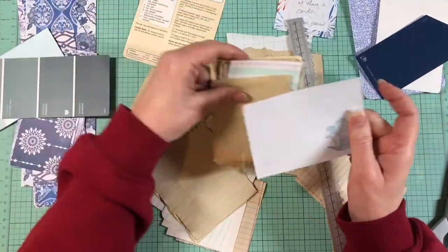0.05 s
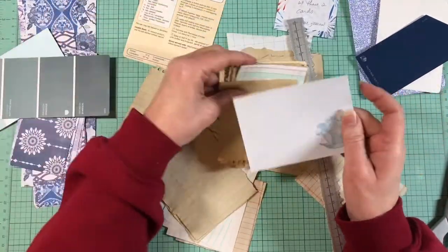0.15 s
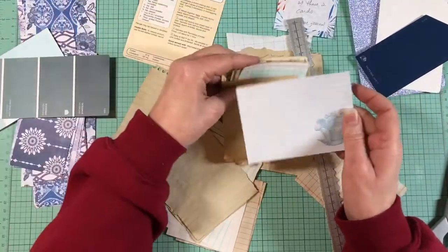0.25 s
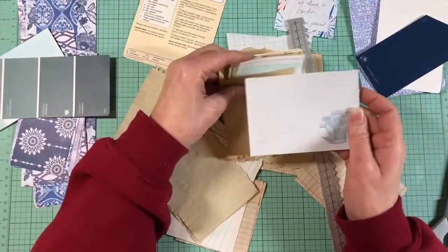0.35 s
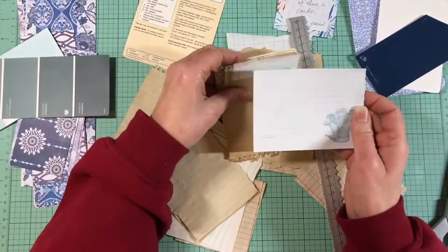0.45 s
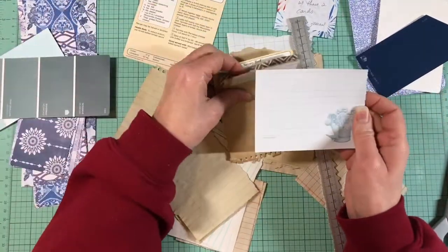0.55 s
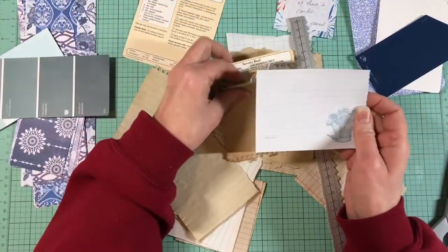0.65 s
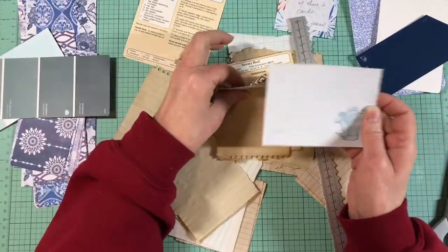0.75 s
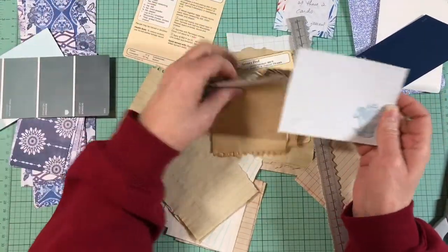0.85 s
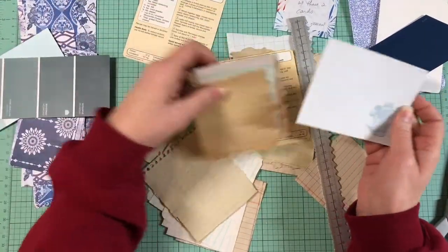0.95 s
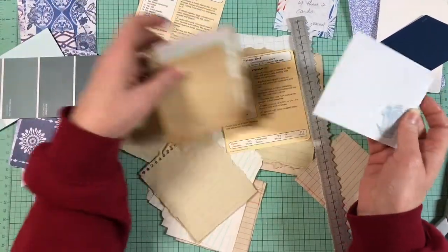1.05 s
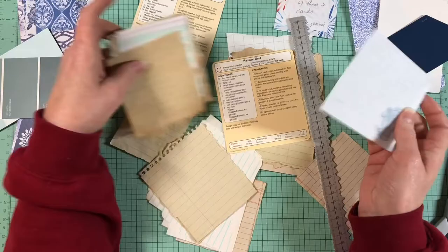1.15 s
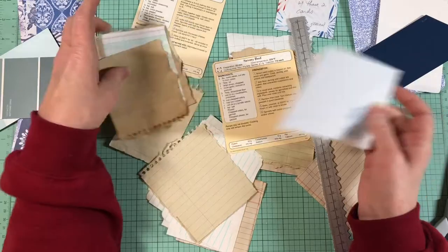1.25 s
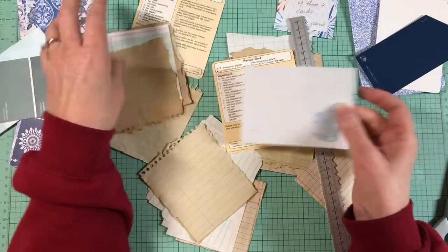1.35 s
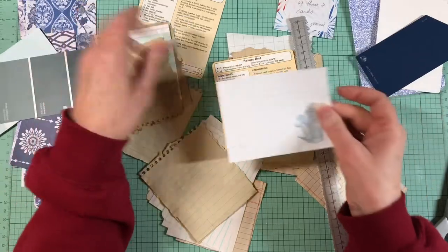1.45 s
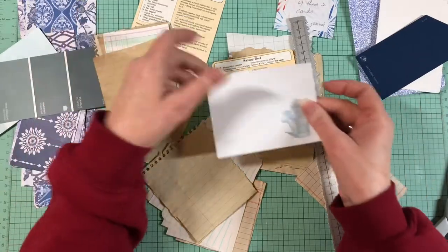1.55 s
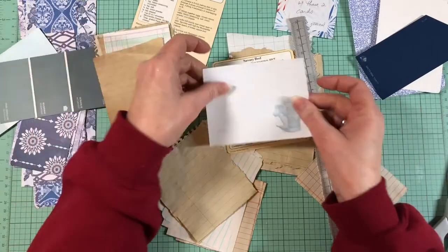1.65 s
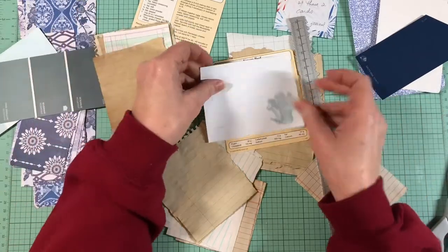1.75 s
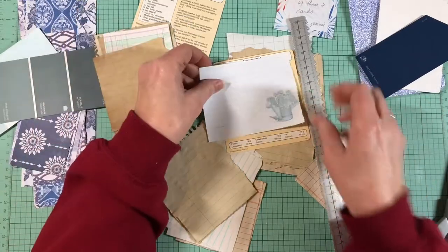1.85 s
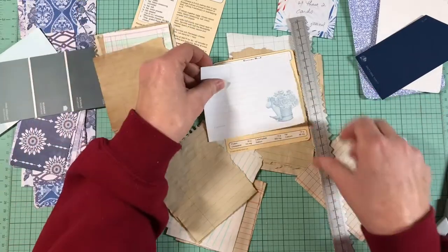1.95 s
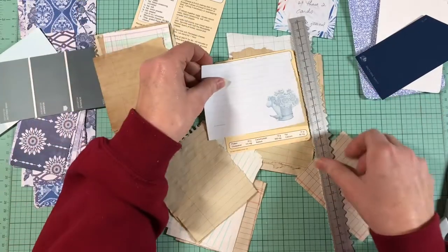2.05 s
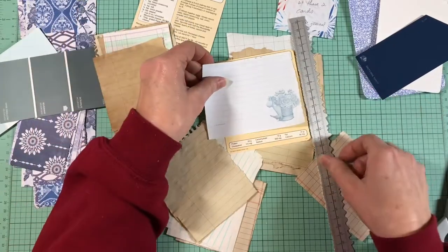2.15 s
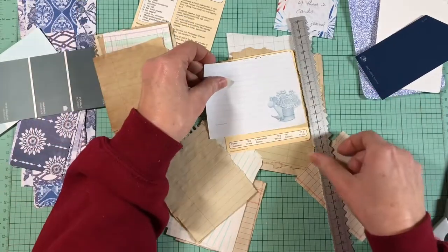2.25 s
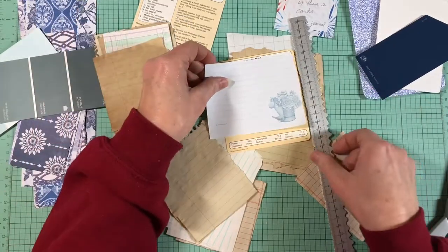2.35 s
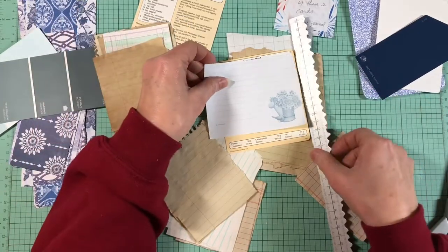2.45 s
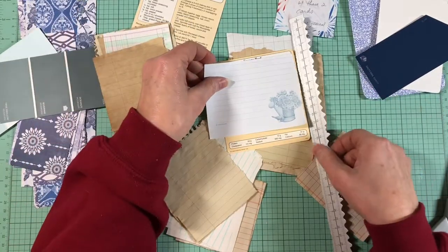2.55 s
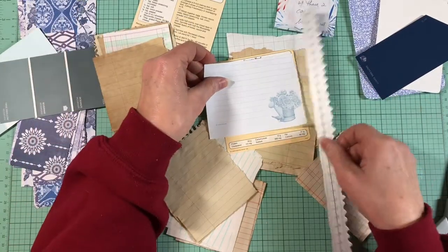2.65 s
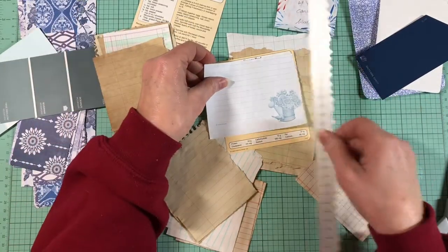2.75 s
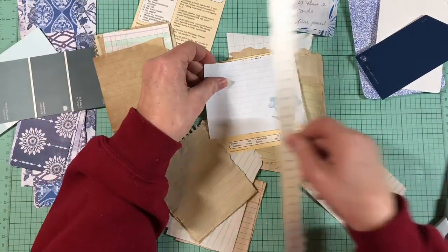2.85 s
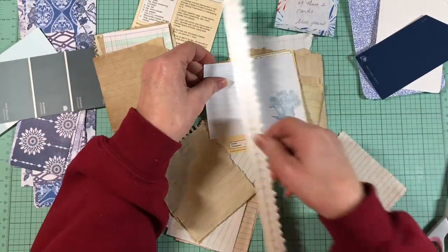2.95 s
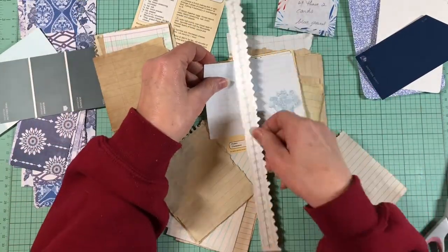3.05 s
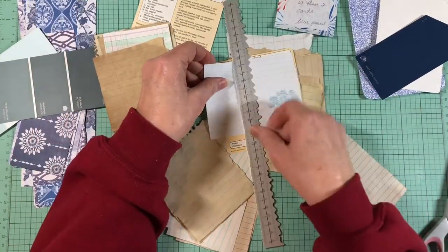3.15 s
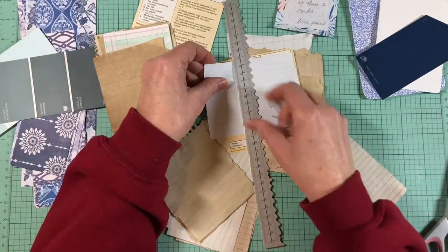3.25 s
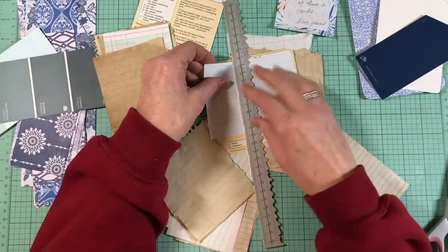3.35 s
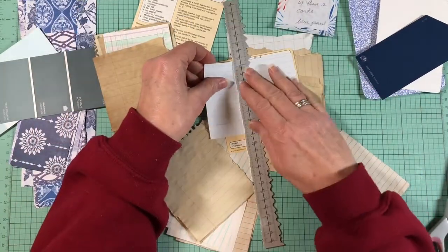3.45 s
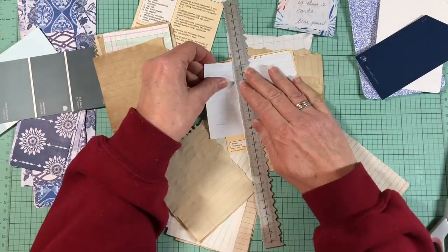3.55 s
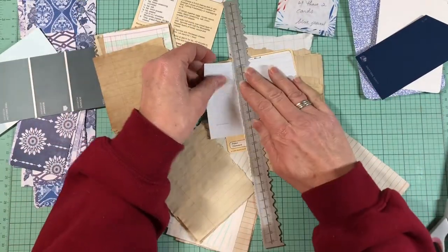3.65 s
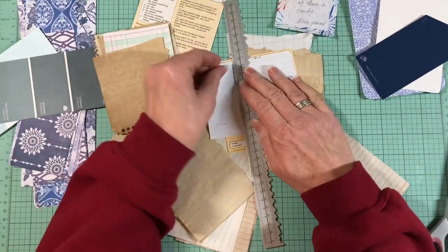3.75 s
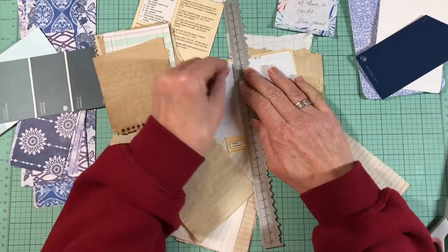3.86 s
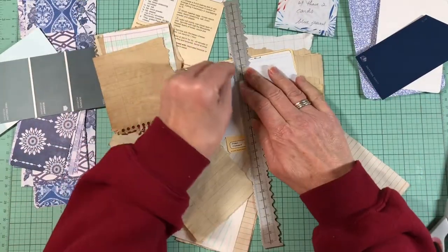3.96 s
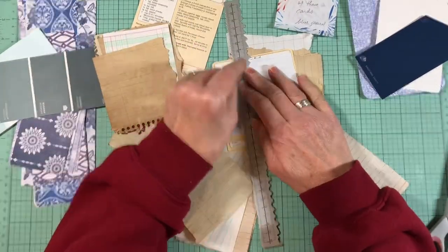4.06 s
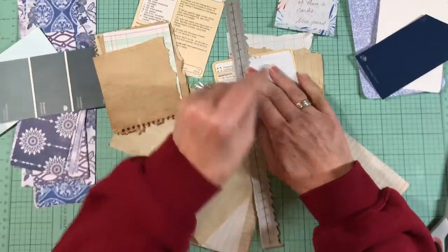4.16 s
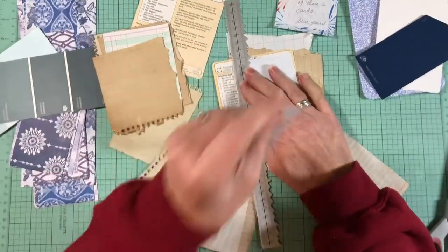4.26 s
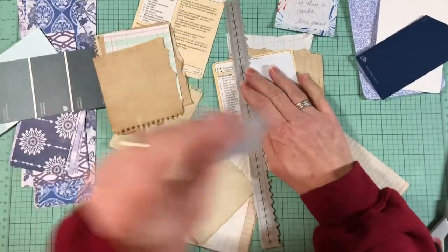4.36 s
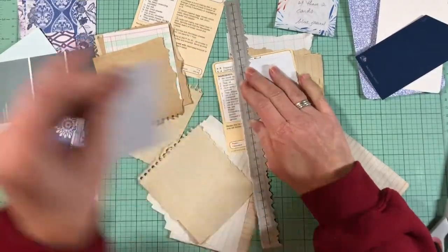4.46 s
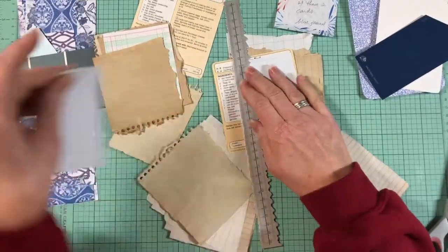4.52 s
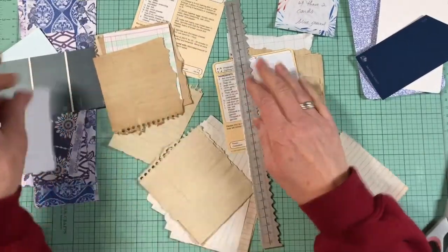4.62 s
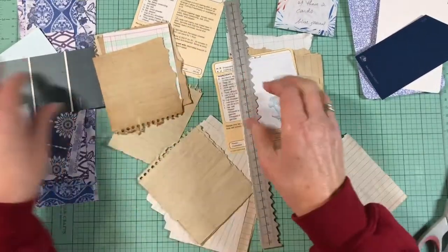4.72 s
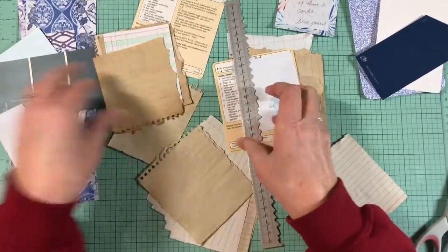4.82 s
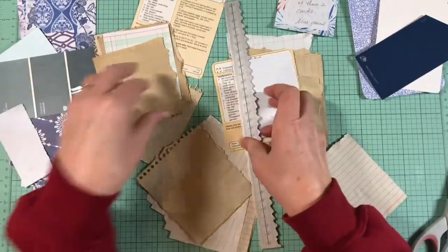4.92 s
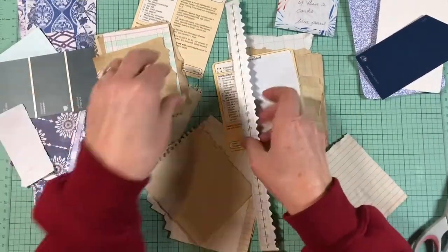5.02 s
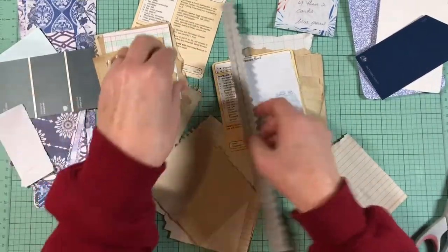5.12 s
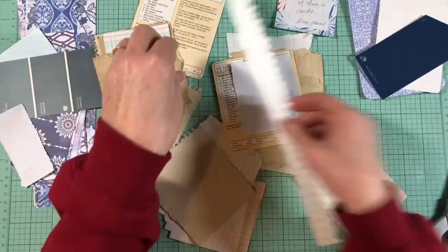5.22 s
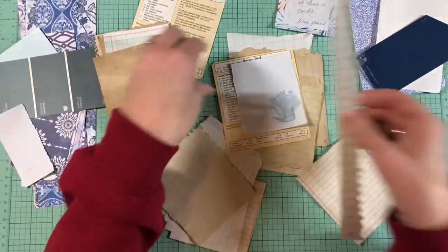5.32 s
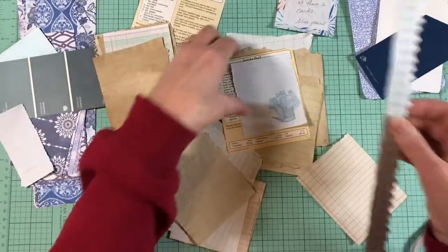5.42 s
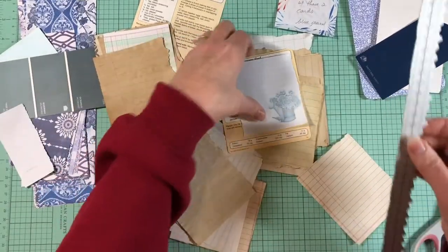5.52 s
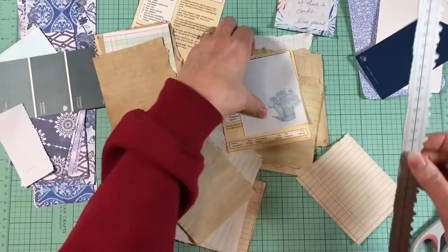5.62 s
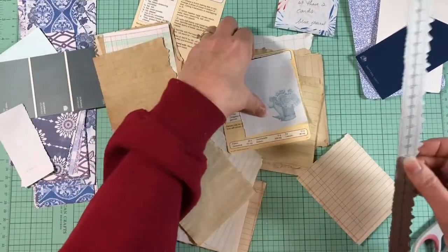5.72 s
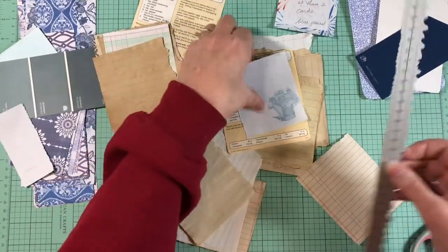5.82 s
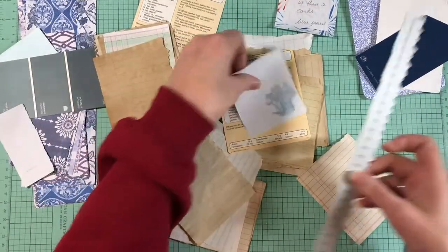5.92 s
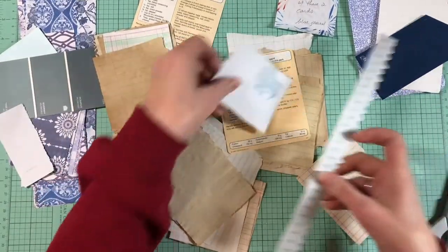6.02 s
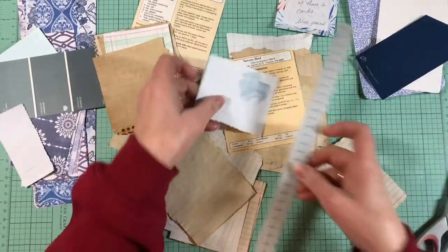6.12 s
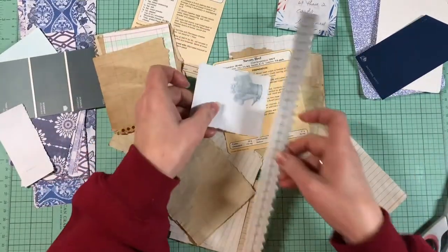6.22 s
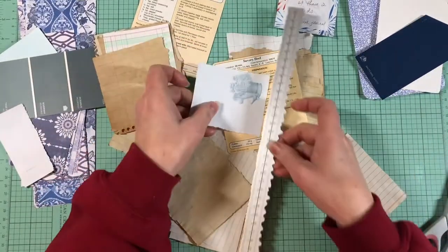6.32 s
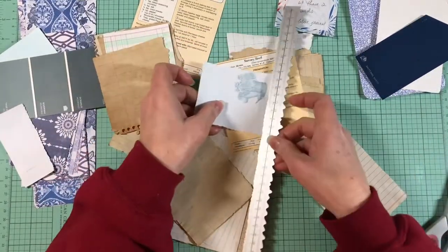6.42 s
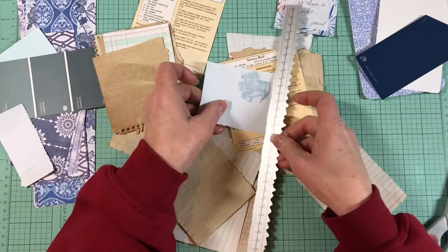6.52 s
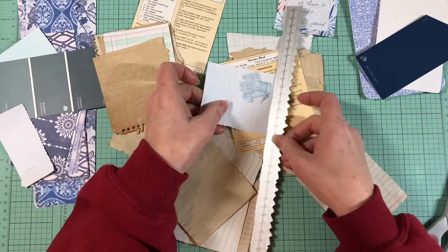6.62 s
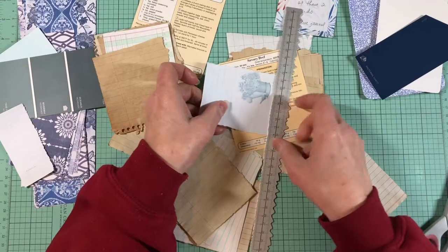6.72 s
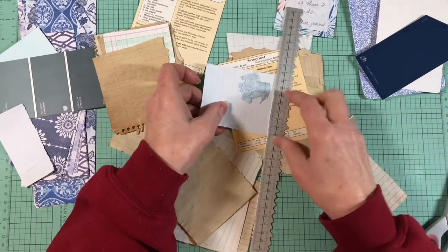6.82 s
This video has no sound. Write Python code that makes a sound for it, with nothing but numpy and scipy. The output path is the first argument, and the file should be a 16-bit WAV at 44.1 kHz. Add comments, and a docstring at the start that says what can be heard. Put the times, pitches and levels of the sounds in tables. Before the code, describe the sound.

Paper sheets slide and flick in a quiet room, a steel ruler clatters, then one quick, crisp rip along its edge and more soft paper handling.

```python
"""Sheets of paper slide and flick about on a craft table, close by in a small quiet room with a low rumble.
Strokes are filtered fibre clicks; hands bump the mat, and a steel ruler taps and clatters as it is handled.
A strip is ripped off along the ruler's edge: dense clicks of snapping fibres drive the sheet's resonances,
strong bunches snap in noise bursts, and a few decaying sines leave a faint ring.
Paper handling goes on afterwards, with a short falling chirp as a card's edge drags off the pile."""
import sys
import numpy as np
from scipy import signal
from scipy.fft import rfft, irfft, next_fast_len
from scipy.io import wavfile
from scipy.ndimage import uniform_filter1d

SR = 44100
rng = np.random.default_rng(int(sys.argv[2]) if len(sys.argv) > 2 else 0)


def file_out(sig):
    """Save sig as 16-bit WAV at sys.argv[1]."""
    # one column per channel
    cols = np.atleast_2d(sig).T
    # limit, then scale
    lim = np.clip(cols, -1, 1)
    pcm = np.round(lim * 32767).astype(np.int16)
    wavfile.write(sys.argv[1], SR, pcm)


N = 303532
TIME = np.arange(N) / SR


def amp(db):
    """Turn decibels into a linear gain."""
    return 10 ** (np.asarray(db) / 20)


def unit(x):
    """Scale to rms 1."""
    return x / np.sqrt(np.mean(x ** 2))


def lookup(points, hz):
    """Read (Hz, value) points on a log-frequency axis."""
    f, value = np.transpose(points)
    return np.interp(np.log(np.maximum(hz, 1)), np.log(f), value)


def colour(x, points, size=4096):
    """Causal minimum-phase filter with the given (Hz, dB) shape; white noise keeps its power."""
    cepstrum = irfft(np.log(amp(lookup(points, np.fft.rfftfreq(size, 1 / SR)))))
    # folding the cepstrum onto positive time makes the filter causal
    cepstrum[1:size // 2] *= 2
    cepstrum[size // 2 + 1:] = 0
    response = irfft(np.exp(rfft(cepstrum)))
    response = response / np.linalg.norm(response)
    return signal.fftconvolve(x, response)[:len(x)]


def resonate(x, hz, width):
    """One resonance, gain 1 at its centre."""
    centre = min(hz, SR / 2 - 1)
    sharpness = hz / min(width, SR / 4)
    b, a = signal.iirpeak(centre, sharpness, SR)
    return signal.lfilter(b, a, x)


def walk(rate):
    """Smooth random drift, rms 1, that takes a new direction about `rate` times a second."""
    hold = max(int(SR / rate), 1)
    steps = np.repeat(rng.standard_normal(N // hold + 1), hold)
    return unit(uniform_filter1d(steps, hold)[:N])


def grains(rate, spread_db):
    """Random clicks of either sign, a few much larger than the rest; rms 1."""
    size = amp(spread_db * np.minimum(rng.exponential(size=N), 4))
    struck = rng.random(N) < rate / SR
    return unit(struck * size * rng.choice([-1, 1], N))


def add(track, s, sound):
    """Mix a sound into a track at time s."""
    i = max(int(s * SR), 0)
    track[i:i + len(sound)] += sound[:N - i]


# broad resonance of a loose sheet: frequency_ratio (multiple of its resonance), level_db
SHEET_BODY_COLOUR = [(.1, -24), (.35, -13), (.6, -9), (.83, -5), (1.1, -5.5), (1.6, -9.5), (2.6, -19),
                     (5, -26), (12, -44.5)]


def sheet_body(x, hz):
    """A broad resonance of a loose sheet, rms 1; the stiffer it is held, the higher it lies."""
    return unit(colour(x, [(ratio * hz, db) for ratio, db in SHEET_BODY_COLOUR]))


def flex(x, rate, depth_db):
    """A bending sheet radiates unevenly: every half octave swells and fades on its own; rms 1."""
    size = next_fast_len(N)
    spectrum, out = rfft(x, size), 0
    octave = np.log2(np.clip(np.fft.rfftfreq(size, 1 / SR), 500, 16000) / 500)
    for band in range(11):
        # neighbouring bands crossfade
        share = np.maximum(1 - np.abs(2 * octave - band), 0)
        out = out + irfft(spectrum * share, size)[:N] * amp(depth_db * walk(rate))
    return unit(out)


# tone balance of the quiet room: frequency_hz, level_db (per Hz)
ROOM_TONE_COLOUR = [(18, -34.5), (30, -23.5), (50, -1), (90, -8), (150, -1), (215, -6), (270, -11),
                    (380, -15.5), (800, -22.5), (1500, -30), (4000, -32.5), (8800, -38.5), (12500, -36.5),
                    (16000, -39)]
ROOM_TONE_DB = -61


def room_tone():
    """Steady low rumble with a faint hiss, from coloured noise."""
    return amp(ROOM_TONE_DB) * unit(colour(rng.standard_normal(N), ROOM_TONE_COLOUR))


# strokes of paper or ruler over paper: peak_s, length_s, friction_db,
# hiss_db (fine hiss against friction), sheet_hz (sheet resonance)
SLIDE_STROKES = [ (.004, .14, -57, -10, 940), (0.118, 0.28, -64.5, -2.5, 1350),
                 (0.211, 0.14, -54, -2, 1360), (0.274, 0.036, -56, -2, 1500),
                 (0.348, 0.17, -56, -0.5, 1450), (0.484, .13, -46.5, -7, 1850),
                 (.645, .21, -47.5, -3, 1950), (0.837, 0.13, -61, 1.5, 1600), (0.928, 0.17, -53.5, 2, 1450),
                 (1.095, 0.54, -66, 2.5, 1600), (1.282, 0.24, -58.5, 0, 1560), (1.453, 0.12, -65, -7, 1350),
                 (1.696, 0.21, -58, -4, 1900), (1.83, 0.084, -60, -6, 1770), (2, 0.95, -67.5, -1.5, 1650),
                 (2.148, .1, -83, 22, 1500), (2.329, 0.078, -61, -1, 1800), (2.507, 0.3, -71, 4.5, 1170),
                 (2.611, 0.062, -62, 9, 1760), (3.129, 0.093, -55, 3, 1900), (3.437, 0.26, -73, 3, 2200),
                 (3.682, 0.28, -54.5, -5, 2400), (3.887, .1, -65.5, 0.5, 1700),
                 (3.987, 0.077, -55, 0, 1800), (4.509, 0.31, -61.5, -2.5, 1830),
                 (5.018, 0.47, -61, 1.5, 1850), (5.641, .06, -65, 0, 2140), (5.846, 0.14, -60.5, 3.5, 1900),
                 (5.949, 0.31, -51, -2, 1950), (6.18, 0.18, -70, -4, 1400), (6.487, 0.42, -60, -3.5, 1650),
                 (6.632, 0.056, -53, -2, 1810), (6.855, 0.17, -66, -1, 1900)]
# tone balance of rubbing friction: frequency_hz, level_db
FRICTION_COLOUR = [(300, -32.5), (900, -20.5), (1900, -5), (3600, 3), (5200, 0.5), (7500, -9),
                   (16000, -18.5)]
# bright fibre noise, also used for crackle and cracks: frequency_hz, level_db
FIBRE_HISS_COLOUR = [(3000, -21.5), (7500, -8.5), (10000, -2), (12500, 2.5), (16000, 0.5)]
RISE_SHARE = 0.51  # part of a stroke spent speeding up
# body against friction: slacker sheets lie lower and sound fuller
SHEET_HZ, SHEET_DB, SHEET_DB_PER_OCTAVE = 1710, -6.5, -10.5
# stray creases that click while a sheet moves
CREASES_PER_S, CREASE_DB, CREASE_HZ = 94, -12, 2500


def sliding():
    """Fibres catch and slip as sheets rub; each stroke swells and fades while the contact comes and goes."""
    out = np.zeros(N)
    contact = amp(1.6 * walk(130))
    slips = grains(2600, 3.2) * contact
    friction = flex(colour(slips, FRICTION_COLOUR), 36, depth_db=4.5)
    hiss = unit(colour(grains(9000, 2.2) * contact, FIBRE_HISS_COLOUR))
    catches = grains(1500, 2.4) * contact
    creases = amp(CREASE_DB) * sheet_body(grains(CREASES_PER_S, 2.2), CREASE_HZ)
    for peak, length, db, hiss_db, hz in SLIDE_STROKES:
        rise = length * RISE_SHARE
        fall = length - rise
        span = slice(max(int((peak - 2 * rise) * SR), 0), int((peak + 2 * fall) * SR))
        away = np.interp(TIME[span] - peak, [-2 * rise, 0, 2 * fall], [2, 0, 2])
        speed = np.exp(-2.3 * away ** 1.36)  # about 20 dB down at each end of the stroke's length
        body_db = SHEET_DB + SHEET_DB_PER_OCTAVE * np.log2(hz / SHEET_HZ)
        body = amp(body_db) * sheet_body(catches[span], hz)
        stroke = friction[span] + creases[span] + amp(hiss_db) * hiss[span] + body
        out[span] += amp(db) * speed * stroke
    return out


# echo decay time: frequency_hz, t60_s
ECHO_T60 = [(150, 0.12), (1000, 0.33), (4000, 0.24), (15000, 0.076)]
# echo against direct sound: frequency_hz, level_db
ECHO_COLOUR = [(100, -2), (1000, -8), (4000, -12), (8000, -6.5), (15000, -13)]


def room(x, size=22050):
    """Diffuse echo of a small room, building over a few ms; the middle outlasts the bass and treble."""
    age, hz = np.arange(size) / SR, np.fft.rfftfreq(size, 1 / SR)
    noise, response = rfft(rng.standard_normal(size)), 0
    for low in 70 * 2 ** np.arange(8):  # octave bands
        centre = low * np.sqrt(2)
        fade = amp(-60 * age / lookup(ECHO_T60, centre)) * (1 - np.exp(-age / 0.002))
        band = irfft(noise * (hz >= low) * (hz < 2 * low), size)
        level = amp(lookup(ECHO_COLOUR, centre))
        response = response + band * fade / np.linalg.norm(fade) * level
    return signal.fftconvolve(x, response)[:N]


def ticks(rows, body_t60_s, crack_t60_s, size=8192):
    """Each snap, flick or tap is a bright crack and a broad sheet resonance that crinkles on briefly."""
    out, age = np.zeros(N), np.arange(size) / SR
    for s, body_db, hz, crack_db in rows:
        body_noise, crack_noise, crease_noise = rng.standard_normal((3, size))
        # the blow is dense; the creases that settle after it are sparse, uneven clicks
        body_blow = body_noise * amp(-60 * age / body_t60_s)
        crack_blow = crack_noise * amp(-60 * age / crack_t60_s)
        crinkle = unit(crease_noise ** 5) * amp(-60 * age / .11)
        body = sheet_body(body_blow + amp(-15) * crinkle, hz)
        crack = colour(crack_blow + amp(-30.5) * crinkle, FIBRE_HISS_COLOUR)
        add(out, s, amp(body_db) * body / np.linalg.norm(body) + amp(crack_db) * crack / np.linalg.norm(crack))
    return out


# sheets buckle or flick: start_s, body_db (energy), body_hz, crack_db (energy)
PAPER_FLICKS = [(.444, -21.5, 2090, -24), (.463, -16.5, 3540, -27), (.4761, -15.5, 3800, -15.5),
                (.604, -16, 2920, -25), (.641, -25, 2880, -36), (.993, -28.5, 1010, -23),
                (1.1177, -32, 3200, -50), (1.183, -33, 1560, -28), (1.349, -25.5, 2400, -38),
                (1.593, -28.5, 1340, -40), (1.6316, -8.5, 1370, -24), (1.647, -16.5, 1314, -28),
                (1.725, -27.5, 1690, -42), (3.966, -16.5, 3330, -18), (4.664, -25.5, 1665, -41),
                (4.6902, -29.5, 1930, -42.5), (4.707, -32.5, 1680, -45), (5.8523, -29, 4500, -14.5)]


def flicks():
    """Sheets buckle or flick against the pile, with a short body and a shorter crack."""
    return ticks(PAPER_FLICKS, body_t60_s=0.04, crack_t60_s=.018)


# hands and ruler bump the table: start_s, peak_db (of the table's tone), rumble_db (against that tone)
TABLE_BUMPS = [(1.635, -59.5, 6.5), (2.015, -49, -7), (3.07, -58.5, 4), (3.143, -51.5, -7), (3.569, -61, 3),
               (3.97, -49, -10), (4.038, -31, -5), (4.068, -25.5, -21), (4.182, -40, -14),
               (4.912, -51, -13.5), (6.678, -58.5, 1.5)]
TABLE_HZ, BUMP_SWELL_S = 136.6, .018


def bumps(size=12000):
    """A soft push swells and dies in the table's lowest mode, with a dull rumble above it."""
    out, age = np.zeros(N), np.arange(size) / SR
    push = (age / BUMP_SWELL_S * np.exp(1 - age / BUMP_SWELL_S)) ** 2
    tone = np.sin(2 * np.pi * TABLE_HZ * age)
    for s, db, rumble_db in TABLE_BUMPS:
        rumble = unit(resonate(resonate(rng.standard_normal(size), 286.3, 260), 290, 350))
        add(out, s, amp(db) * push * (tone + amp(rumble_db) * rumble))
    return out


# the ruler taps and clatters: start_s, body_db (energy), body_hz, crack_db (energy)
RULER_TAPS = [(1.999, -30.5, 4000, -33), (2.012, -32, 2720, -20.5), (3.0544, -24.5, 3400, -27),
              (3.0661, -13.5, 2720, -33), (3.09, -15.5, 2200, -31), (3.1422, -11, 2330, -19),
              (3.283, -37, 3300, -28), (3.305, -34, 3500, -20.5), (3.407, -34, 2900, -33.5),
              (4.8355, -29, 2600, -30), (4.8536, -26.5, 1980, -29), (4.903, -20.5, 2850, -26),
              (4.996, -29, 3810, -24), (5.5066, -27, 2900, -42), (5.5364, -30.5, 2860, -38.5),
              (6.6552, -16.5, 3520, -10.5), (6.6705, -12.5, 4210, -17.5), (6.684, -7, 3040, -8)]


def taps():
    """The ruler taps and clatters as it is gripped, lifted and laid down."""
    return ticks(RULER_TAPS, body_t60_s=0.028, crack_t60_s=.02)


# tone balance of the tearing rasp: frequency_hz, level_db
RASP_COLOUR = [(60, -22), (110, 5), (200, 3), (380, -2.5), (520, 2.5), (680, -7.5), (1100, -6),
               (1500, -6.5), (2200, -2), (2900, -4.5), (4000, 0), (5500, -12.5), (7500, -23),
               (16000, -27.5)]
# resonances of the taut sheet: frequency_hz, width_hz, level_db
TAUT_SHEET_MODES = [(516, 35, -1), (697, 13, 2.5), (1022, 38, 9), (1217, 33, -1), (1348, 10, -8),
                    (1880, 67, -3.5), (2250, 70, -1.5), (2515, 20, -10), (3170, 76, -0.5),
                    (3730, 340, -9.5), (4580, 160, -1.5), (5470, 38, -6)]
# the pull builds from the first snap, eases near the end of the edge and is gone when the strip comes free
RIP_START_S, RIP_ATTACK_S, RIP_BUILD_S, RIP_EASE_S = 4.036, .002, 0.091, 0.057
PULL_START_DB, PULL_PEAK_DB, PULL_END_DB, RELEASE_DB_PER_S = -35, -29.5, -36, 375
# crackle in the mix: its level at the first snap, its fall while tearing, its extra fall once free
CRISP_DB, DULLING_DB_PER_S, FREE_DULLING_DB_PER_S = -2.5, 16.5, 500


def rip():
    """Fibres break in bunches along the ruler's edge and shake the taut sheet."""
    age = np.maximum(TIME - RIP_START_S, 0)
    length = RIP_BUILD_S + RIP_EASE_S
    free = np.maximum(age - length, 0)  # time since the strip came free
    pull_db = np.interp(age, [0, RIP_BUILD_S, length], [PULL_START_DB, PULL_PEAK_DB, PULL_END_DB])
    pull = np.minimum(age / RIP_ATTACK_S, 1) * amp(pull_db - RELEASE_DB_PER_S * free)
    crisp_db = CRISP_DB - DULLING_DB_PER_S * age - FREE_DULLING_DB_PER_S * free
    bunches = unit(amp(3.4 * walk(520)))
    breaks = grains(5000, 1.8) * bunches
    rasp = flex(colour(breaks, RASP_COLOUR), 170, depth_db=2.5)
    sheet = sum(amp(db) * resonate(breaks, hz, width) for hz, width, db in TAUT_SHEET_MODES)
    crackle = colour(grains(4000, 3.9) * bunches, FIBRE_HISS_COLOUR)
    return pull * (amp(-0.5) * rasp + amp(-6.5) * unit(sheet) + amp(crisp_db) * crackle)


# faint tones after the rip: pitch_hz, level_db (against one another), t60_s
RING_TONES = [(336, -11, 8.4), (356, -6.5, 2.2), (495, -5, .5), (610, -10, 1.6)]


def ring():
    """A few low, wavering tones hang on after the rip and die away as the ruler is lifted."""
    age = np.maximum(TIME - RIP_START_S, 0)
    tones = np.zeros(N)
    for hz, db, t60 in RING_TONES:
        level = amp(db - 60 * age / t60 + 3.3 * walk(27))
        tones += level * np.sin(2 * np.pi * hz * age + walk(28))
    held = np.interp(TIME, [4.82, 4.95], [1, 0])
    return amp(-50) * (age > 0) * held * tones


# strong bunches of fibres snap in the rip: start_s, body_db (energy), body_hz, crack_db (energy)
FIBRE_SNAPS = [(4.0368, -7, 2200, 0.5), (4.0399, 0, 3000, 3.5), (4.047, -9, 3600, -2),
               (4.0585, -3.5, 1600, 2.5), (4.0656, -9.5, 2780, 0), (4.0678, -3.5, 2800, 7),
               (4.1036, -3, 4300, -17.5), (4.1126, -3.5, 1501, -8.5), (4.1322, -4, 1400, -5),
               (4.1387, -0.5, 1110, -10), (4.187, -10, 1510, -25)]


def snaps():
    """Strong bunches of fibres let go at once, each a very short crack and thump of the sheet."""
    return ticks(FIBRE_SNAPS, body_t60_s=.009, crack_t60_s=0.0034)


# the scuff's loudest moment, level, pitch at that moment, and time to swell or fade by a factor e
SCUFF_S, SCUFF_DB, SCUFF_HZ, SCUFF_LENGTH_S = 6.045, -54, 1590, 0.011
SCUFF_FALL_OCTAVES = 0.17  # pitch fall over each SCUFF_LENGTH_S


def scuff():
    """A card's edge is dragged off the pile: a short, rough chirp that falls as it slows."""
    progress = np.clip((TIME - SCUFF_S) / SCUFF_LENGTH_S, -4, 4)
    pitch_hz = SCUFF_HZ * 2 ** (-SCUFF_FALL_OCTAVES * progress)
    phase = 2 * np.pi * np.cumsum(pitch_hz) / SR
    # random drift on both quadratures roughens the tone
    chirp = unit(walk(600) * np.sin(phase) + walk(600) * np.cos(phase))
    return amp(SCUFF_DB) * np.exp(-progress ** 2) * chirp


def scene():
    """Paper and ruler close by in the room, over the table's bumps, the ring and the room's rumble."""
    paper = sliding() + flicks() + taps() + rip() + snaps() + scuff()
    return (paper + room(paper) + bumps() + ring() + room_tone())[None]


TOP_HZ = 16100


def record(dry):
    """The recorder cuts the top with a steep low-pass."""
    low_pass = signal.ellip(10, .2, 80, TOP_HZ, fs=SR, output="sos")
    return signal.sosfilt(low_pass, dry)


dry = scene()
out = record(dry)
file_out(out)
```